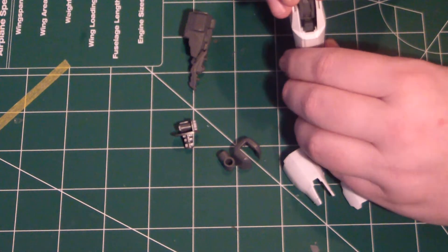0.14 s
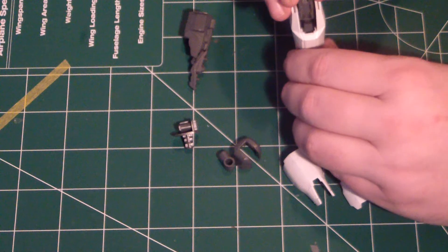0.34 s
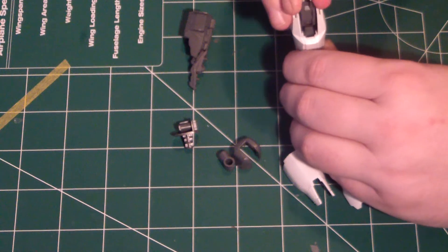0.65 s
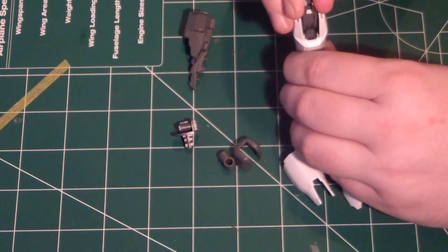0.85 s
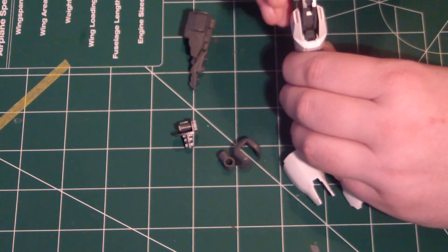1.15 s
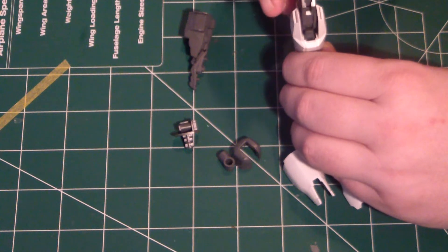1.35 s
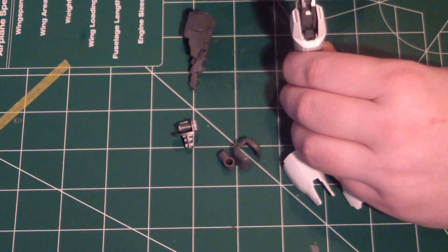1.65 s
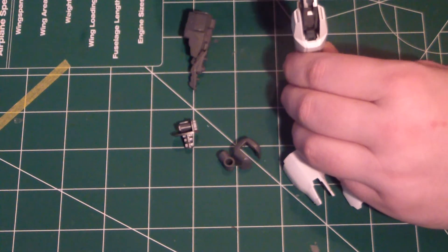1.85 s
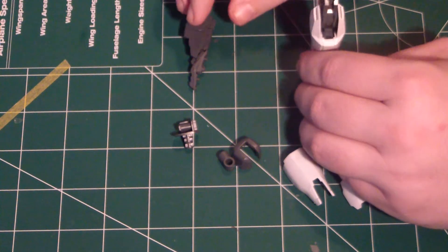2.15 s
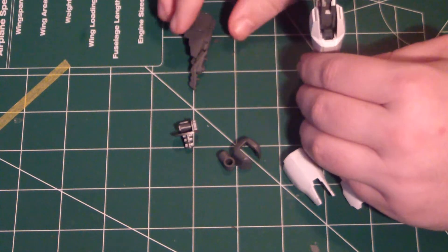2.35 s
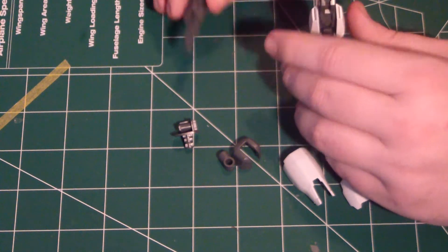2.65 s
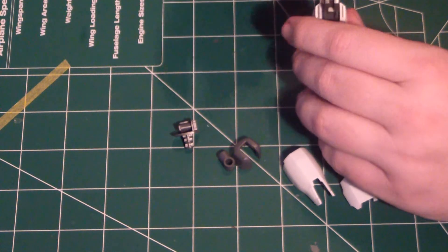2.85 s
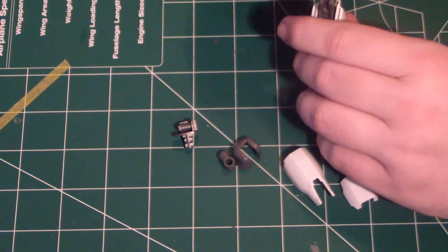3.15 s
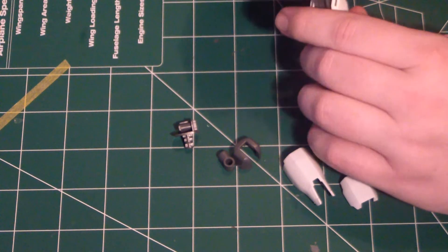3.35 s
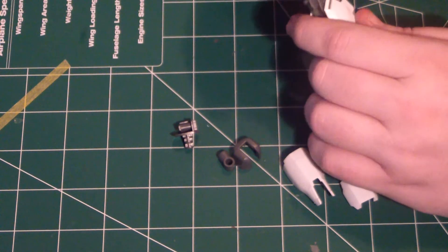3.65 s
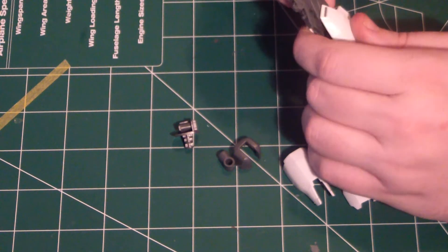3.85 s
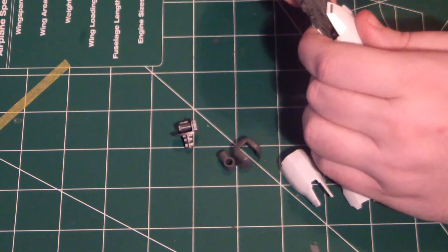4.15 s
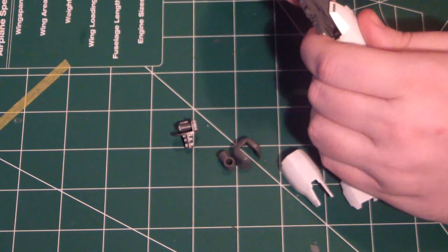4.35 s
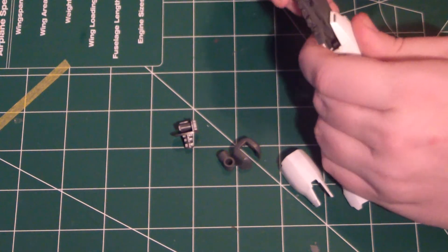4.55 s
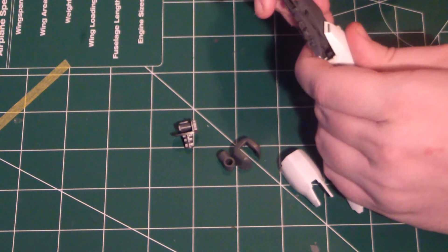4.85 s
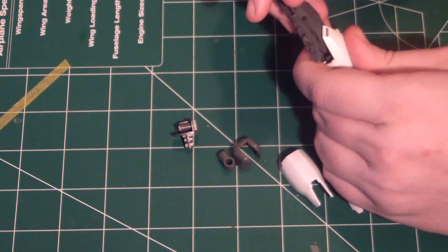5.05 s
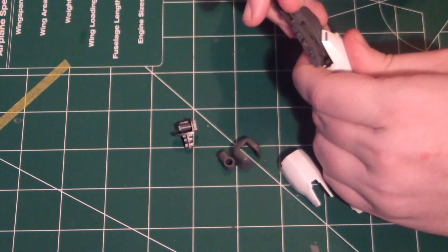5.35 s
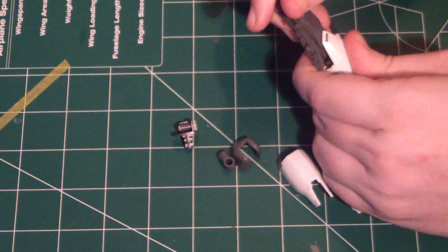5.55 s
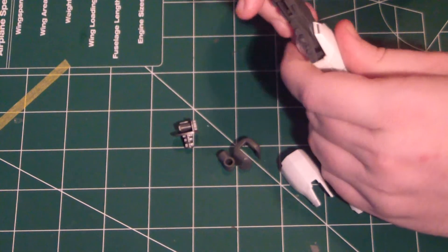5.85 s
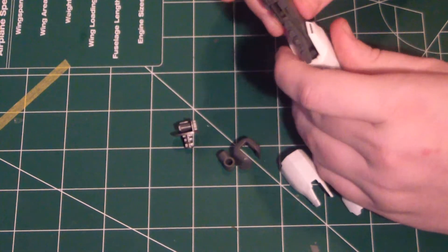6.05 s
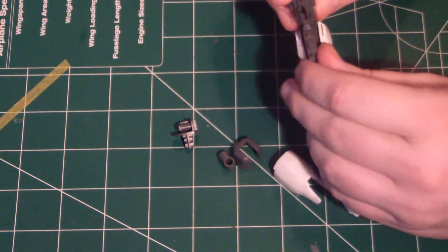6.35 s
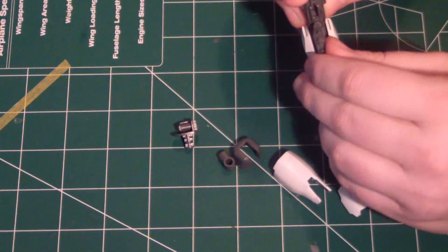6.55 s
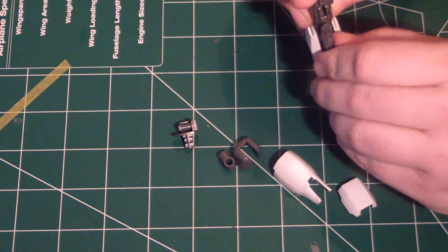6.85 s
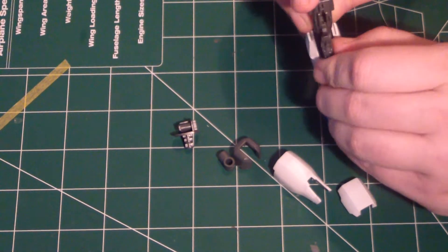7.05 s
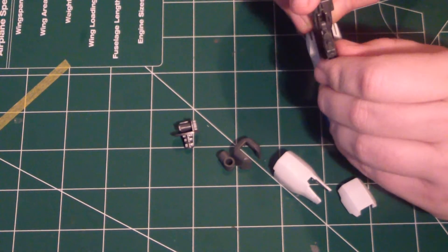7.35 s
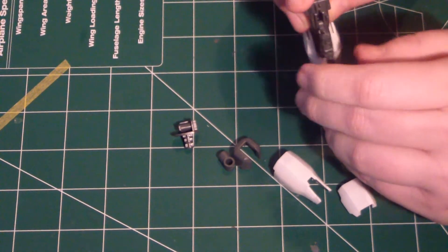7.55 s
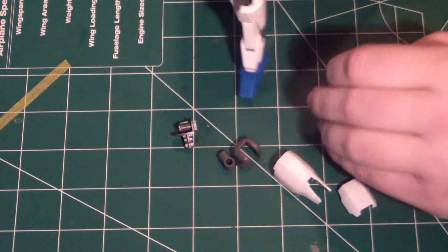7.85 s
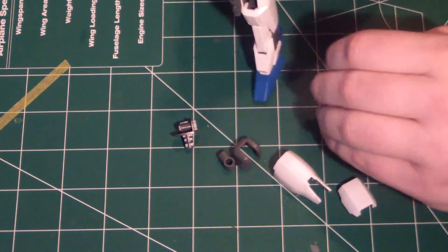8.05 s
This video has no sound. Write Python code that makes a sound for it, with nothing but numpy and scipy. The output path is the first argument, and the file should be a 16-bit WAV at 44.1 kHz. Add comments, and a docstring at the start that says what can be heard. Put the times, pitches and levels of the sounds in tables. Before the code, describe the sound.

A close stereo pickup in a small, dry room, with steady low mains hum, rumble and soft hiss throughout. Hard plastic model parts are handled over a desk mat, slightly to the right. Small clicks and bumps lead to a loud bright snap at 0.24 s, a knock at 0.5 and another hard snap with a thump at 0.6. It then stays mostly quiet, with soft skin rubs and dull brushes around 2.0-2.5 s. From 2.8 to 3.8 s come little clicks, faint squeaks and a short creak with a click near 3.37. Light ticks continue from 4.3; a smaller snap falls at 5.23 and a loud one at 5.44, jolting the desk. A stiff joint turns in rapid jerks at 6.17-6.27 and again at 6.74-6.85, with a small snap. Near quiet follows until faint bumps around 8 s and a harsh, squeaky plastic scrape from 8.1 to the end.

```python
"""A desk with a cutting mat in a small, dry room, a small two-capsule microphone close by.
Far back: mains hum, low rumble and steady hiss, as a sum of sines and shaped noise.
On the mat: bumps, brushes and a stiff joint turning in jerks, as short forces that ring desk modes.
In the hands: hard plastic parts click, rub, squeak and creak, as noise bursts and friction through resonances.
Nearest: pegs snap home, as bright cracks with two damped rings; at the end a part scrapes."""
import sys
import numpy as np
from scipy import signal
from scipy.fft import rfft, irfft, next_fast_len
from scipy.io import wavfile
from scipy.ndimage import uniform_filter1d

SR = 44100
rng = np.random.default_rng(int(sys.argv[2]) if len(sys.argv) > 2 else 0)


def unload_wav(signal):
    """Save mono or channel-first audio to the path in sys.argv[1] as 16-bit WAV at rate SR, clipped to [-1, 1]."""
    wavfile.write(
        sys.argv[1],
        SR,
        np.round(np.clip(np.atleast_2d(signal).T, -1, 1) * 32767).astype(np.int16),
    )


N = 361619
TIME = np.arange(N) / SR
HIT = np.arange(SR // 5) / SR   # s, time along one short sound
LEAD_S = 0.008   # room for the rise of a contact before its listed time
CUTOFF_HZ = 15950   # top of the audible band


def from_db(db):
    """Decibels to gain."""
    return 10 ** (np.asarray(db) / 20)


def unit(x):
    """Scale to energy 1."""
    return x / np.sqrt(np.sum(x ** 2) + 1e-20)


def at_hz(points, hz):
    """Read a table on a log-frequency axis."""
    f, value = np.transpose(points)
    return np.interp(np.log(np.maximum(hz, 1)), np.log(f), value)


def level_curve(rows):
    """Gain over time from (t/s, level/dB) rows, silent before the first."""
    return from_db(np.interp(TIME, *np.transpose(rows), left=-200))


def coloured(x, points):
    """Causal (minimum-phase) filter through (f/Hz, level/dB) points, by folding the cepstrum."""
    half = next_fast_len(x.shape[-1] // 2 + 1)
    gain = from_db(at_hz(points, np.linspace(0, SR / 2, half + 1)))
    cepstrum = irfft(np.log(gain))
    cepstrum[1:half] *= 2
    cepstrum[half + 1:] = 0
    response = np.exp(rfft(cepstrum))
    return irfft(rfft(x, 2 * half) * response)[..., :x.shape[-1]]


def resonance(x, hz, width_hz):
    """Two-pole band-pass with gain 1 at its centre."""
    r = np.exp(-np.pi * width_hz / SR)
    zeros = np.array([1, 0, -1]) * (1 - r * r) / 2
    poles = [1, -2 * r * np.cos(2 * np.pi * hz / SR), r * r]
    return signal.lfilter(zeros, poles, x)


def varied(modes, scatter_db, detune):
    """The same modes, a little different in pitch and strength at every touch."""
    draws = rng.standard_normal((len(modes), 2))
    return [(hz * np.exp(detune * a), db + scatter_db * b, t60)
            for (hz, db, t60), (a, b) in zip(modes, draws)]


def ringing(modes, wave=np.cos):
    """Impulse response of a set of modes, each dying by 60 dB in its t60."""
    return sum(from_db(db - 60 * HIT / t60) * wave(2 * np.pi * hz * HIT) for hz, db, t60 in modes)


def drive(force, response):
    """A contact force played through a response."""
    return signal.fftconvolve(force, response)[:len(HIT)]


def even(force, span_hz):
    """A brief force whose energy is spread evenly from one span of pitches to the next; energy 1."""
    power = abs(rfft(unit(force))) ** 2
    hz = np.linspace(1, SR / 2, len(power))
    size = max(round(span_hz / hz[1]), 1)
    local = uniform_filter1d(uniform_filter1d(power, size), size)
    flattening_db = -10 * np.log10(local + 0.02)   # the offset limits the boost
    return unit(coloured(force, np.column_stack([hz, flattening_db])))


def add(track, s, sound):
    """Mix a sound in at a time."""
    start = max(round(s * SR), 0)
    track[..., start:start + sound.shape[-1]] += sound[..., :max(N - start, 0)]


# mains hum at the microphone: multiple of the mains frequency, level/dB rms
HUM = [(1, -46), (2, -61), (3, -58.5), (4, -70), (5, -65.5), (6, -69), (7, -71), (8, -72.5)]
MAINS_HZ = 60.0


def hum():
    """The mains frequency and its multiples as steady sines, alike in both capsules."""
    out = 0
    for k, db in HUM:
        phase = 2 * np.pi * (round(k) * MAINS_HZ * TIME + rng.random())
        out = out + from_db(db) * np.sin(phase)
    return np.sqrt(2) * out


# tilt of the steady rumble and hiss: f/Hz, relative level/dB per Hz
FLOOR = [(20, -15), (35, -22), (52, -11), (75, -18.5), (110, -17), (170, -22), (300, -24), (450, -28.5),
         (900, -32), (3250, -37), (16000, -40.5)]
FLOOR_DB = -53.42   # dB rms of the part between 700 Hz and the cutoff
# how alike the two capsules hear it: f/Hz, shared fraction of power
LIKENESS = [(30, 0.21), (130, 0.37), (290, 0.14), (640, 0.23), (3000, 0.1), (15000, 0.13)]
# a faint narrow hiss: f/Hz, width/Hz
NARROW_HISS = (3233, 300)
# its course: t/s, level/dB rms
NARROW_HISS_LEVEL = [(0, -58.5), (.8, -61.5), (6.3, -61), (6.7, -67.5), (8.2, -68)]


def background():
    """Shaped noise, partly shared by both capsules and partly each capsule's own, plus a narrow hiss."""
    size = 2 * next_fast_len(N // 2 + 1)
    hz = np.linspace(0, SR / 2, size // 2 + 1)
    alike = np.clip(at_hz(LIKENESS, hz), 0, 1)
    gain = from_db(at_hz(FLOOR, hz))
    gain = gain / np.sqrt(np.mean(gain ** 2 * (hz > 700) * (hz < CUTOFF_HZ)))
    shared = rfft(rng.standard_normal(size))
    own = rfft(rng.standard_normal((2, size)))
    mixture = np.sqrt(alike) * shared + np.sqrt(1 - alike) * own
    hiss = from_db(FLOOR_DB) * irfft(gain * mixture)[:, :N]
    narrow = unit(resonance(rng.standard_normal((2, N)), *NARROW_HISS)) * np.sqrt(2 * N)
    return hiss + level_curve(NARROW_HISS_LEVEL) * narrow


# decay of the small dry room: f/Hz, t60/s
ROOM_T60 = [(100, 0.097), (300, 0.076), (1000, 0.14), (4000, 0.11), (9000, 0.11), (15000, 0.082)]
# colour of the reflections of sounds from the plastic parts: f/Hz, level/dB
PLASTIC_ECHO = [(500, -3), (2500, 2.5), (4500, 2.5), (9000, -1.5), (12000, 1.5), (16000, -4)]
# colour of the reflections of sounds from the desk: f/Hz, level/dB
DESK_ECHO = [(100, -10), (170, -9), (260, 0), (500, -2.5), (1100, 1.5), (1900, -4.5), (4000, 1)]


def room(x, colour, wet_db, gap_s, apart_db):
    """Direct sound plus dense reflections that die by band, part shared and part each capsule's own."""
    edges = np.geomspace(50, 18000, 10)
    build_up = 1 - np.exp(-(HIT / gap_s) ** 2)
    tail = 0
    for low, high in zip(edges, edges[1:]):
        band_pass = signal.butter(2, [low, high], "band", fs=SR, output="sos")
        band = signal.sosfilt(band_pass, rng.standard_normal((3, len(HIT))))
        decay = from_db(-60 * HIT / at_hz(ROOM_T60, np.sqrt(low * high)))
        band = band * decay * build_up
        tail = tail + np.array([unit(b) for b in band]) * np.sqrt(2 * (high - low) / SR)
    tail = coloured(tail[0] + from_db(apart_db) * tail[1:], colour)   # row 0 is shared
    reflections = signal.fftconvolve(x[None], tail, axes=1)[:, :len(x)]
    return x + from_db(wet_db) * reflections


# a peg seats and the hands jolt the desk: t/s, relative level/dB
JOLTS = [(5.451, -23)]
# slow modes that this stirs: f/Hz, relative level/dB, t60/s
SWAY = [(35.5, -1.7, 0.29), (148, -1.4, 0.16)]


def jolts(sway_db=-3):
    """The desk sways briefly under the hands: slow damped sines."""
    out = np.zeros(N)
    for s, db in JOLTS:
        add(out, s, from_db(db + sway_db) * ringing(SWAY, np.sin))
    return out


# faint brief squeaks in the handling, and one louder short creak with a click:
# t/s of the middle, length/s, level/dB, f/Hz
BRIEF_SQUEAKS = [(2.839, 0.037, -59.5, 716), (2.954, 0.024, -57, 1270), (3.215, 0.036, -60.5, 1303),
                 (3.37, 0.016, -44, 2056), (3.625, 0.026, -60, 2080), (3.79, 0.031, -61, 1510)]


def brief_squeaks(width_hz=70):
    """Short, rough, narrow notes, squeaks and one creak: noise through a doubled resonance in a swell."""
    out = np.zeros(N)
    middle = HIT[-1] / 2
    for s, length, db, hz in BRIEF_SQUEAKS:
        noise = rng.standard_normal(len(HIT))
        note = resonance(resonance(noise, hz, width_hz), hz, width_hz)
        swell = np.exp(-(2 * (HIT - middle) / length) ** 2)
        add(out, s - middle, from_db(db) * unit(swell * note) * np.sqrt(length * SR))
    return out


def friction(size, catches_per_s, smooth_db):
    """Sliding: random catches over a smooth hiss."""
    catches = (rng.random(size) < catches_per_s / SR) * rng.standard_normal(size)
    return unit(catches) + from_db(smooth_db) * unit(rng.standard_normal(size))


# skin rubs on plastic and mat: t/s of the middle, swell width/s (cut to 0.2 s), level/dB, rub f/Hz
RUBS = [(0.118, 0.065, -56.5, 6920), (2.109, 0.44, -51, 500), (2.758, 0.15, -57.5, 9800),
        (2.927, 0.086, -56.5, 1380), (3.332, 0.057, -52.5, 10000), (3.678, 0.17, -57.5, 3840),
        (4.507, 0.14, -52, 6400), (6.09, 0.1, -47.5, 1770)]
# shared colour of the rubs: f/Hz, level/dB
RUB_COLOUR = [(200, -3), (900, 4.5), (2000, 7.5), (4000, 5), (7000, -1), (10000, 4.5), (16000, -2)]


def rubs(focus_db=9, focus_width=0.71):
    """The hands shift their grip: soft swells of friction, each gathered around a pitch of its own."""
    out = np.zeros(N)
    middle = HIT[-1] / 2
    for s, length, db, hz in RUBS:
        grains = coloured(friction(len(HIT), catches_per_s=240, smooth_db=-1), RUB_COLOUR)
        grains = grains + from_db(focus_db) * resonance(grains, hz, focus_width * hz)
        grains = unit(grains) * np.sqrt(len(HIT))
        swell = np.exp(-(2 * (HIT - middle) / length) ** 2)
        add(out, s - middle, from_db(db) * swell * grains)
    return out


# loose contacts of figure and fingers with the mat:
# t/s, relative level/dB, weight of the bass/dB, contact length/ms
BUMPS = [(0.0693, 8.5, 5, 3.4), (0.174, -3, 4, 2.5), (0.2189, 3.5, 5, 3.6), (0.2344, 12.5, 4, 3.2),
         (0.4025, 0, -3, 2.5), (0.5156, 15, -3, 2.96), (0.6064, 25.5, 3.5, 0.24), (0.985, -9.5, -5, 1.9),
         (1.117, 1, 8, 5.7), (2.011, -2.5, 0, 6.9), (2.086, -4.5, 11, 24), (2.152, -4, 9.5, 12),
         (2.294, -6.5, -29.5, 7.7), (2.476, 2, -13.5, 8), (2.539, -5.5, -8, 10), (3.366, -12, -24, 4.9),
         (5.4449, 4.5, -9.5, 1.5), (5.494, -2.5, 6, 3.3), (5.751, -7.5, 15.5, 2.4), (5.769, 0, 17.5, 1.67),
         (7.976, -5, 9, 3.9), (8.156, -5, 12, 2.9)]
# the desk top: f/Hz, level/dB when bumped, level/dB when driven through the figure's foot, t60/s
DESK = [(68.5, -10, -13, 0.14), (107, -24, -5.5, 0.052), (154.8, -12, -6.5, 0.24), (192, -7.5, -20, 0.054),
        (288, 1, 1.5, 0.086), (346, 3.5, 3.5, 0.034), (397, -2.5, 3.5, 0.037), (446, -1.5, 4.5, 0.049),
        (495, -8, -7, 0.02), (643, -12, -16, 0.016), (736, 1, 5, 0.032), (780, 2.5, -19, 0.015),
        (1020, -4, -2, 0.013), (1134, 0.5, -17, 0.068), (1378, 4, -1.5, 0.039), (1440, 2.5, -4, 0.019),
        (1730, 9, 14, 0.011), (2040, 1.5, -2, 0.044)]
# heavier and harder bumps sink into the mat and are duller:
# brightness in dB, its loss per dB of weight, its loss per dB of level
BUMP_BRIGHT_DB, WEIGHT_DULLS, LEVEL_DULLS = -6, 0.37, 0.053


def knock(modes, bass_db, bright_db, contact_ms, push_db, chatter_db, treble_db, rebound_db, rebound_ms,
          scatter_db=2, detune=0.03, mat_hz=2100):
    """A push, its rebound and a brief chatter, softened by the mat, ring the desk top.

    The resting hands shift the desk's modes a little at every knock."""
    after_ms = (HIT - LEAD_S) * 1000
    chatter = unit(rng.standard_normal(len(HIT)) * np.exp(-(after_ms / contact_ms - 1) ** 2))
    push = 1 / max(contact_ms / 2, 1)   # a long contact is more brush than blow
    rebound = np.exp(-(3 * (after_ms / rebound_ms - 1)) ** 2)
    force = from_db(chatter_db) * chatter - push * from_db(rebound_db) * rebound / rebound.sum()
    force[round(LEAD_S * SR)] += push
    response = ringing(varied(modes, scatter_db, detune))
    response[0] += from_db(push_db)   # the blow itself is heard directly
    mat = signal.butter(5, min(mat_hz, SR / 3), fs=SR, output="sos")
    sound = signal.sosfilt(mat, drive(even(force, span_hz=173), response))
    colour = [(30, bass_db - 11.0), (170, bass_db - 2.0), (550, 0), (750, 0),
              (1300, bright_db + 0.5), (2100, bright_db - 2.0), (3200, bright_db + treble_db)]
    return -coloured(sound, colour)


def bumps(level_db=-42, choke_per_db=0.1):
    """Knocks and brushes on the mat; the harder the figure presses, the sooner the desk stops ringing."""
    out = np.zeros(N)
    for s, db, bass_db, contact_ms in BUMPS:
        choke = np.exp(-choke_per_db * max(db, 0))
        modes = [(hz, bump_db, t60 * choke) for hz, bump_db, foot_db, t60 in DESK]
        bright_db = BUMP_BRIGHT_DB - WEIGHT_DULLS * bass_db - LEVEL_DULLS * db
        bump = knock(modes, bass_db, bright_db, contact_ms, push_db=27, chatter_db=0.5, treble_db=12,
                     rebound_db=-10, rebound_ms=0.89)
        add(out, s - LEAD_S, from_db(db + level_db) * bump)
    return out


# turns of the stiff joint: bass/dB, brightness/dB, jerks as (t/s, relative level/dB)
TURNS = [(9, -3, [(6.166, 1.9), (6.187, 3.2), (6.1935, 11), (6.2053, 8.2), (6.2437, 14), (6.2698, 13.3)]),
         (13, -4.5, [(6.7376, 8.8), (6.762, 9.5), (6.7823, 10.3), (6.8127, 11), (6.8302, 9.5),
         (6.8465, 8.9)])]
# tone of the jerks through the desk: f/Hz, level/dB
JERK_COLOUR = [(80, 0.5), (150, 1), (240, -4.5), (350, -1), (520, -1.5), (800, -0.5), (1300, 2), (1900, 0),
               (3000, -3)]
# a stronger jerk is sharper: middling level in dB; treble gained and bass lost per dB above it
MIDDLE_JERK_DB, JERK_TILT_DB_PER_DB = 12, 0.5


def jerks(level_db=-44.0):
    """The stiff joint sticks and lets go; each jerk kicks the desk through the figure's foot."""
    out = np.zeros(N)
    modes = [(hz, foot_db, t60) for hz, bump_db, foot_db, t60 in DESK]
    for bass_db, bright_db, slips in TURNS:
        for s, db in slips:
            tilt_db = JERK_TILT_DB_PER_DB * (db - MIDDLE_JERK_DB)
            kick = knock(modes, bass_db - tilt_db, bright_db + tilt_db, contact_ms=1.34, push_db=20.5,
                         chatter_db=2.5, treble_db=3.0, rebound_db=-7.5, rebound_ms=1.5)
            add(out, s - LEAD_S, from_db(db + level_db) * kick)
    return coloured(out, JERK_COLOUR)


def joint_ticks(below_db=-31, slip_ms=1.2, ring_hz=7500, ring_spread=0.24, top_db=-2):
    """At each jerk the joint itself ticks faintly, each time at another pitch; returns click rows."""
    rows = []
    for bass_db, bright_db, slips in TURNS:
        for s, db in slips:
            hz = ring_hz * np.exp(ring_spread * rng.uniform(-1, 1))
            rows.append((s, db + below_db, slip_ms, hz, top_db))
    return rows


def slip(slip_ms, build_up):
    """Plastic gives way in a burst of tiny catches that swells and dies."""
    progress = (HIT - LEAD_S) * 1000 / max(slip_ms, 0.2)
    swell = np.exp(-np.maximum(progress, -progress / max(build_up, 0.05)))
    return even(rng.standard_normal(len(HIT)) * swell, span_hz=480)


# plastic edges click in the hands:
# t/s, relative level/dB, slip length/ms (at least 0.2), ring of the part f/Hz, top at 14 kHz level/dB
CLICKS = [(0.0711, -10.5, 0.52, 2640, -5), (0.083, -20, 3, 6900, -12), (0.232, -8, 2.8, 6900, -4),
          (0.2491, 4.5, 3.9, 4600, -12), (0.516, -10.5, 1.2, 3420, -4), (0.5788, -19.5, 1.6, 3960, -5),
          (1.118, -13, 1.4, 3620, -5), (1.753, -20.5, 3.8, 6500, -36), (2.481, -11.5, 3, 9600, -9),
          (2.915, -14, 3.2, 7100, -8), (3.0845, -10, 2, 6450, 4), (3.089, -9, 4.8, 9600, -4),
          (3.1519, -19.5, 0.18, 4930, 10), (3.2533, -16, 4, 4840, 4), (3.3638, -4.5, 1.4, 9700, 8),
          (3.371, -3.5, 3.4, 13600, 2), (3.379, -7.5, 2.5, 9700, -10), (3.616, -16.5, 4.8, 2140, 6),
          (3.657, -18.5, 5.8, 3750, -5), (4.293, -10, 1.6, 6200, 2), (4.4922, -15, 2.7, 5500, 3),
          (4.528, -6.5, 4.1, 5070, 2), (4.7994, -12.5, 0.44, 3400, -10), (4.874, -26, 1.6, 3700, -4),
          (4.898, -19, 1.4, 3530, -12), (4.921, -30, 1.5, 9500, 0), (5.0106, -18, 0.96, 3500, -12),
          (5.0172, -27, 1.7, 7400, 10), (5.125, -23, 1.3, 9750, -3), (5.495, -9.5, 2, 4020, -23),
          (5.73, -11, 0.87, 7250, -7), (5.7355, -13, 2.3, 7600, 8), (5.7776, -18, 0.76, 7200, -26),
          (5.865, -21, 3.3, 3970, -8), (6.1947, -3, 2.7, 6450, -11), (6.3448, -13.5, 1.2, 9000, 0),
          (6.4554, -20.5, 1.1, 7070, -6), (6.6314, -20.5, 2, 9400, -1), (7.57, -25, 2, 9550, 1)]
# the hollow plastic shells: f/Hz, level/dB, t60/s
SHELL = [(1960, -45, 0.021), (3650, -15.5, 0.0087), (4330, -27, 0.0096), (5070, -29, 0.025),
         (7800, -29, 0.017), (8650, -20, 0.0023), (9740, -18, 0.0092), (14000, -35, 0.004)]
# the struck part and its overtones: multiple of its ring, relative level/dB
PART = [(0.999, -5), (1.58, -9), (2.2, -16)]
# the harder a click, the thinner: body in dB at level 0 dB, its loss per dB of level
BODY_DB, BODY_LOSS_DB_PER_DB = -8.5, 0.74
# a part that rings higher has more edge at 9 kHz: edge in dB of a middling part, its ring, rise per octave
EDGE_DB, MIDDLE_RING_HZ, EDGE_DB_PER_OCTAVE = 2, 5700, 5
# a hard click clamps the part, a light touch lets it ring: loss of its ring per dB of level
RING_LOSS_DB_PER_DB = 0.83


def clicks(level_db=-2.5, own_ring_db=-20, own_t60_s=0.010, crack_db=-2, low_db=-12, bottom_db=-20,
           hollow_db=-2, build_up=0.51, scatter_db=2, detune=0.022):
    """An edge slips; the burst cracks and rings the part and the shells, whose pitches shift with the grip."""
    out = np.zeros(N)
    for s, db, slip_ms, ring_hz, top_db in CLICKS + joint_ticks():
        body_db = BODY_DB - BODY_LOSS_DB_PER_DB * db
        edge_db = EDGE_DB + EDGE_DB_PER_OCTAVE * np.log2(ring_hz / MIDDLE_RING_HZ)
        part_db = own_ring_db - RING_LOSS_DB_PER_DB * db
        part = [(k * ring_hz, part_db + k_db, own_t60_s / k) for k, k_db in PART]
        response = ringing(varied(SHELL, scatter_db, detune) + part)
        response[0] += from_db(crack_db) * 2   # the crack itself is heard directly
        colour = [(100, body_db + bottom_db), (500, body_db + low_db), (1100, body_db), (2200, body_db),
                  (2850, body_db + hollow_db), (3500, -edge_db / 2), (6000, -edge_db / 2),
                  (9000, edge_db / 2), (14000, top_db)]
        click = coloured(unit(drive(slip(slip_ms, build_up), response)), colour)
        add(out, s - LEAD_S, from_db(db + level_db) * click)
    return out


# a part scrapes at the end: t/s, level/dB rms
SCRAPE = [(8.085, -59), (8.11, -36), (8.125, -30), (8.143, -27.5), (8.156, -30), (8.168, -27), (8.185, -31),
          (8.2, -35)]
# its colour: f/Hz, level/dB
SCRAPE_COLOUR = [(100, -45), (600, -2.5), (1900, -6), (2600, -1), (6300, -2), (8500, 2.5), (9400, -2),
                 (10800, 6), (13000, 2), (16000, -6)]
# resonances that the scraping edge excites: f/Hz, width/Hz, level/dB
SQUEAKS = [(2490, 76, 9), (3130, 89, 3), (4540, 140, 3), (7600, 120, -7), (8600, 270, 13.5), (9900, 260, 5)]


def scrape():
    """A hard edge drags along: dense friction that squeaks in narrow resonances."""
    grains = coloured(friction(N, catches_per_s=11000, smooth_db=-2), SCRAPE_COLOUR)
    squeaks = sum(from_db(db) * resonance(grains, hz, width_hz) for hz, width_hz, db in SQUEAKS)
    return level_curve(SCRAPE) * unit(grains + squeaks) * np.sqrt(N)


# pegs snap home: t/s, relative level/dB, slip length/ms, body level/dB, top at 15 kHz level/dB,
# room level/dB, low ring f/Hz, its level/dB, high ring f/Hz, its level/dB
SNAPS = [(0.2375, 13, 0.98, -7, -1.5, -10, 3700, -9, 15400, 10.5),
         (0.6088, 13, 1, -16, 1, -11.5, 4800, 4, 8900, 1),
         (5.234, 5, 0.56, -14.5, -9, -8.5, 5470, 9.5, 8500, 11.5),
         (5.4443, 13, 1, -13, 2.5, -10, 3650, 6.5, 7100, 1),
         (6.8229, 1, 0.53, -6.5, 0, -8, 3630, 8, 9360, 9.5)]
# what all snaps share between body and top: f/Hz, level/dB
SNAP_COLOUR = [(3600, -3.5), (4400, -3.5), (6500, -2.5), (8500, 0.5), (11500, 0), (13500, 1)]
SNAP_RING_WIDTH_HZ = 380   # at 4 kHz; the fingers damp the rings this much


def snaps(level_db=-1.0, build_up=0.64, hollow_db=-1, low_db=-6, bottom_db=-16):
    """Each peg cracks through two damped rings of its own part, with room reflections of its own."""
    out = np.zeros((2, N))
    for s, db, slip_ms, body_db, top_db, wet_db, low_hz, low_ring_db, high_hz, high_ring_db in SNAPS:
        body = [(100, body_db + bottom_db), (900, body_db + low_db), (1600, body_db),
                (2900, body_db + hollow_db)]
        crack = coloured(slip(slip_ms, build_up), body + SNAP_COLOUR + [(15000, top_db)])
        rings = 0
        for hz, ring_db in [(low_hz, low_ring_db), (high_hz, high_ring_db)]:
            width_hz = SNAP_RING_WIDTH_HZ * np.sqrt(hz / 4000)
            rings = rings + from_db(ring_db) * resonance(crack, hz, width_hz)
        snap = room(unit(crack + rings), PLASTIC_ECHO, wet_db, gap_s=0.00051, apart_db=1.0)
        add(out, s - LEAD_S, from_db(db + level_db) * snap)
    return out


def scene(plastic_pan_db=0.7, desk_pan_db=1.14):
    """The hands work a little to the right of the microphone."""
    desk = room(bumps() + jerks() + jolts(), DESK_ECHO, wet_db=-5.5, gap_s=0.00033, apart_db=-18)
    handling = clicks() + scrape() + rubs() + brief_squeaks()
    plastic = snaps() + room(handling, PLASTIC_ECHO, wet_db=-8.0, gap_s=0.0033, apart_db=-4.0)
    desk = desk * from_db([[-desk_pan_db], [desk_pan_db]])   # left, right
    plastic = plastic * from_db([[-plastic_pan_db], [plastic_pan_db]])
    return hum() + background() + desk + plastic


def record(dry):
    """The loudest peaks are clipped flat, then the top is cut steeply."""
    clipped = np.clip(dry, -1.8, 1.8)
    low_pass = signal.ellip(12, 0.1, 80, CUTOFF_HZ, fs=SR, output="sos")
    return signal.sosfilt(low_pass, clipped)


dry = scene()
out = record(dry)
unload_wav(out)
```